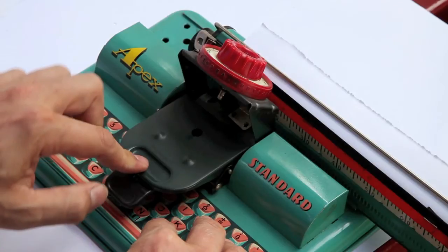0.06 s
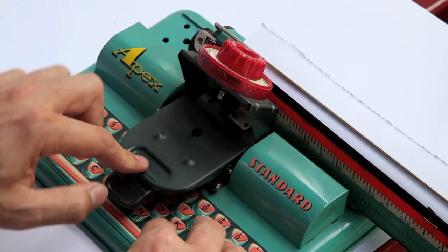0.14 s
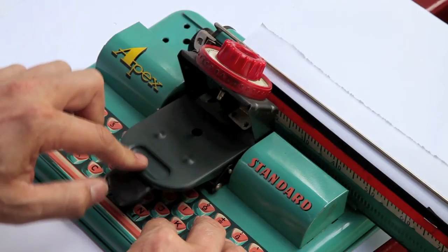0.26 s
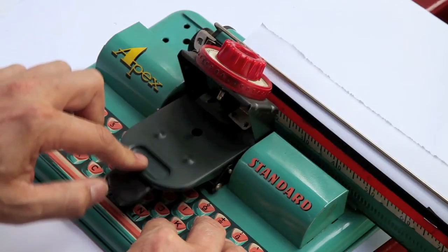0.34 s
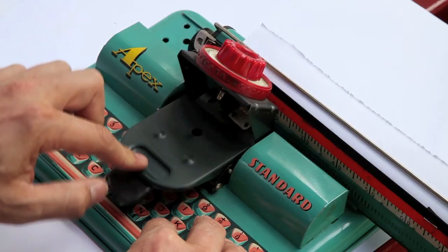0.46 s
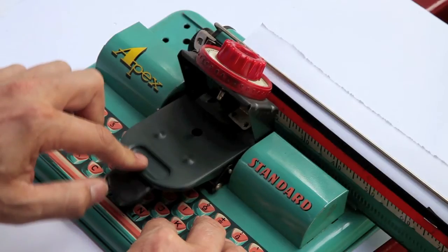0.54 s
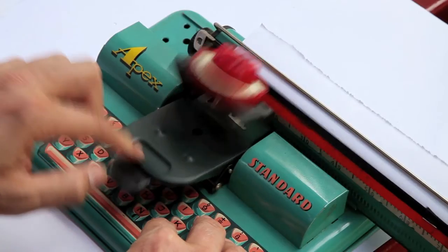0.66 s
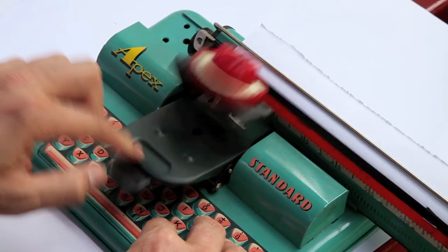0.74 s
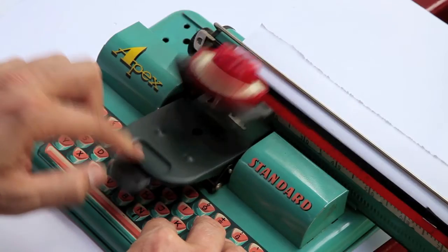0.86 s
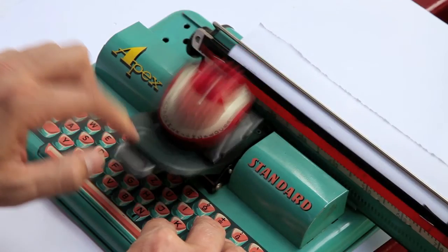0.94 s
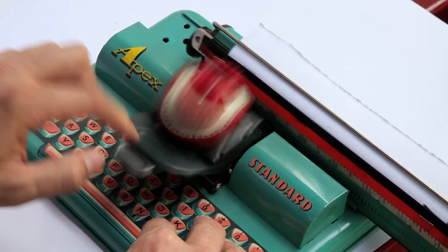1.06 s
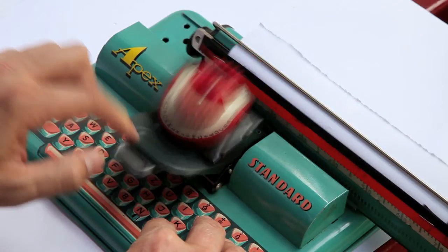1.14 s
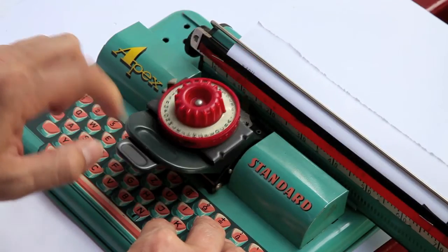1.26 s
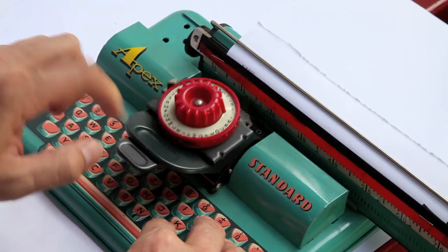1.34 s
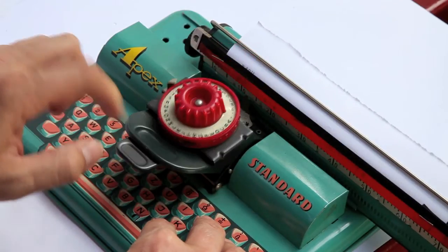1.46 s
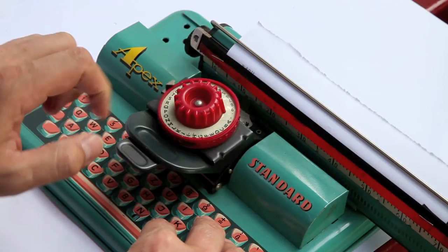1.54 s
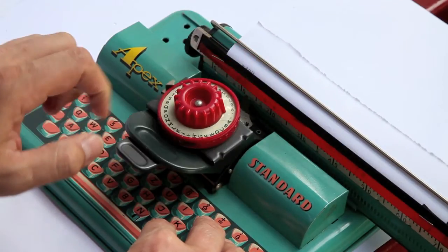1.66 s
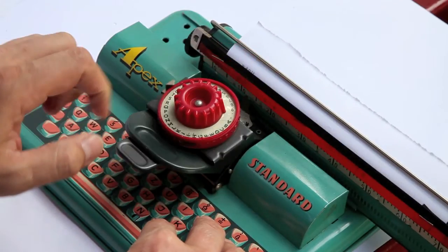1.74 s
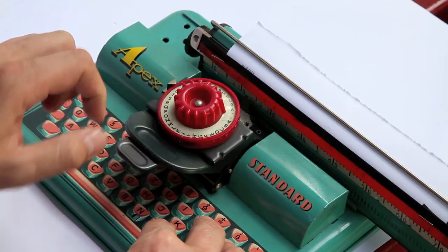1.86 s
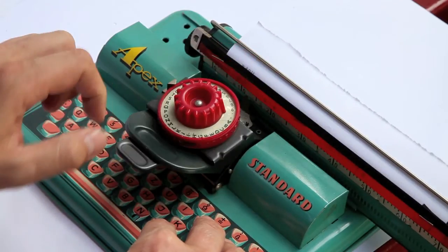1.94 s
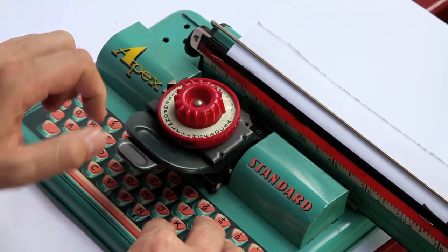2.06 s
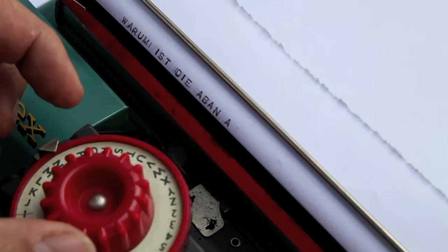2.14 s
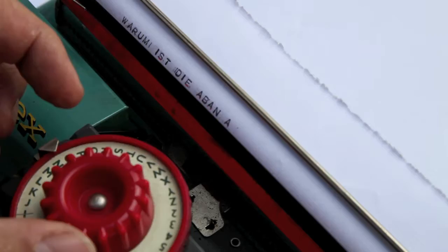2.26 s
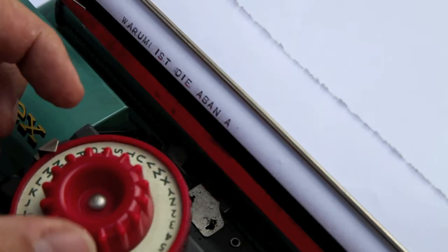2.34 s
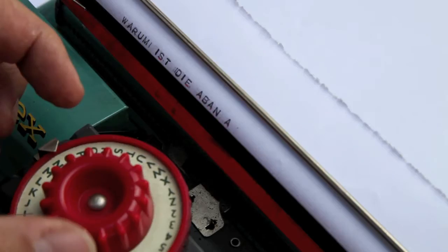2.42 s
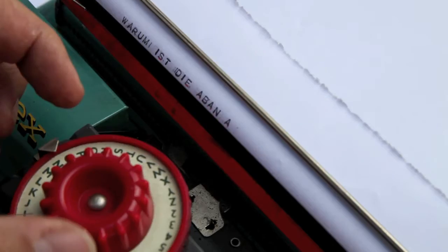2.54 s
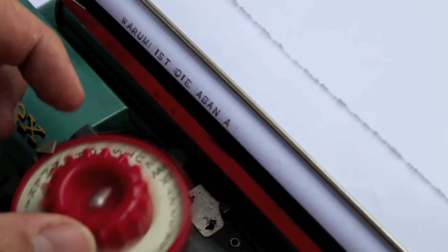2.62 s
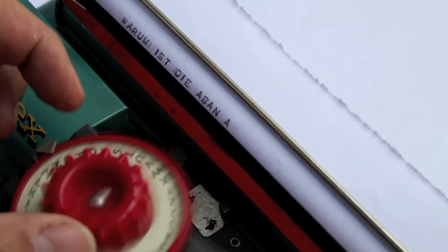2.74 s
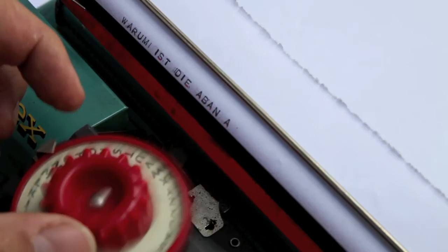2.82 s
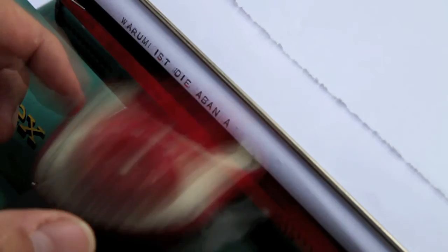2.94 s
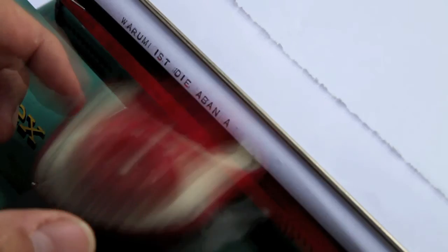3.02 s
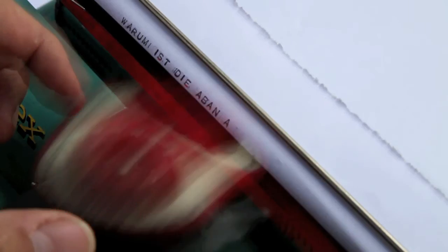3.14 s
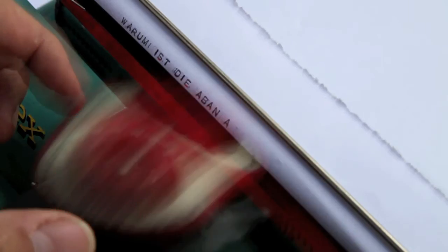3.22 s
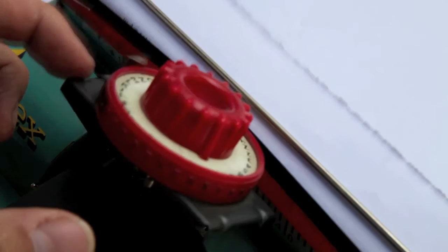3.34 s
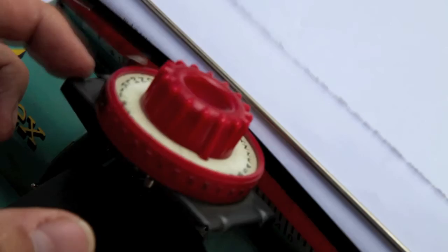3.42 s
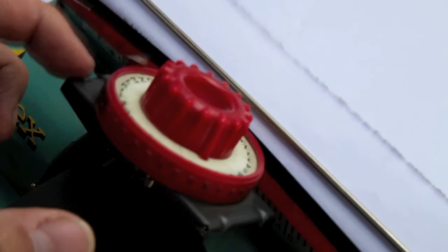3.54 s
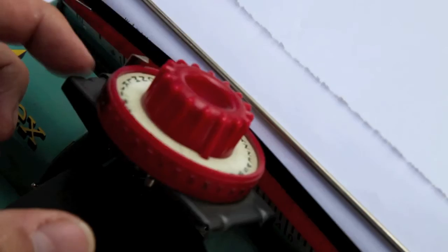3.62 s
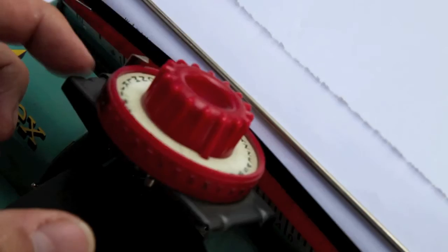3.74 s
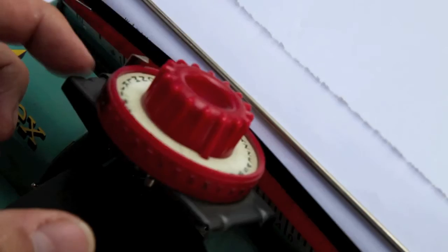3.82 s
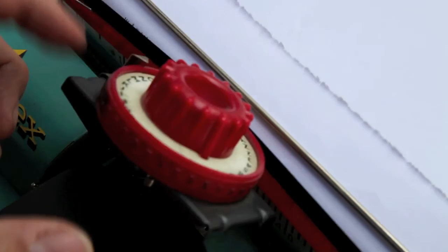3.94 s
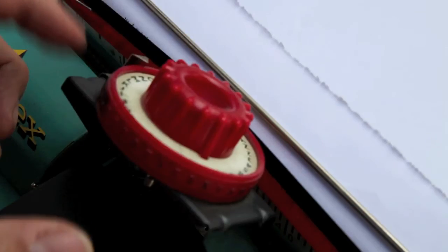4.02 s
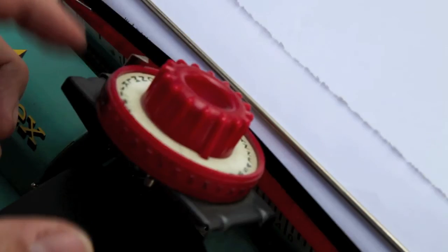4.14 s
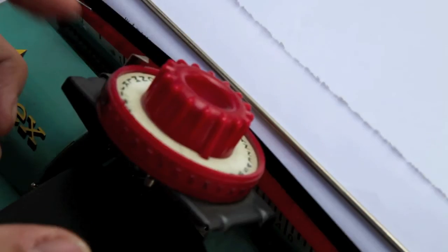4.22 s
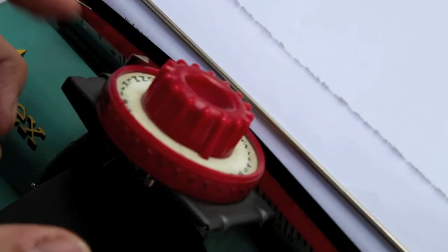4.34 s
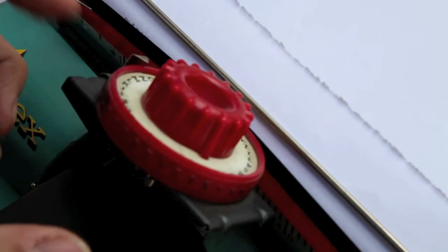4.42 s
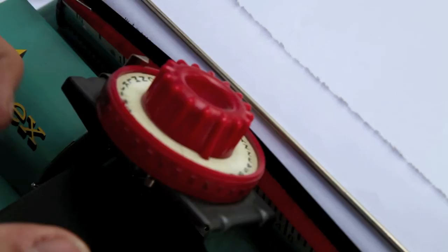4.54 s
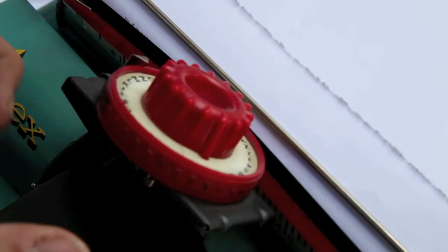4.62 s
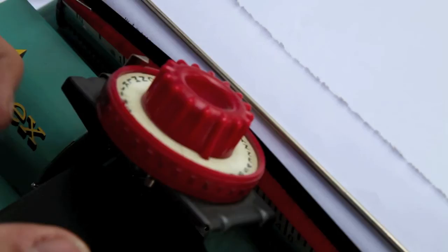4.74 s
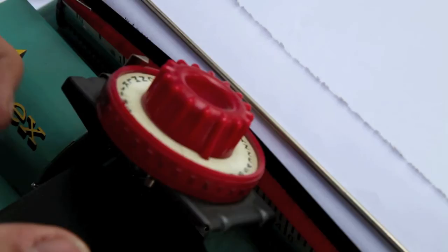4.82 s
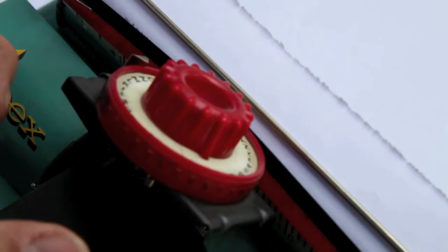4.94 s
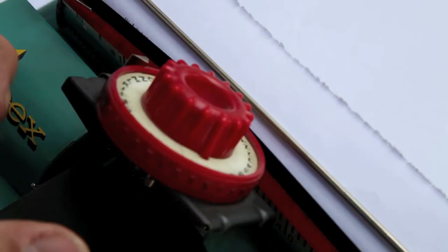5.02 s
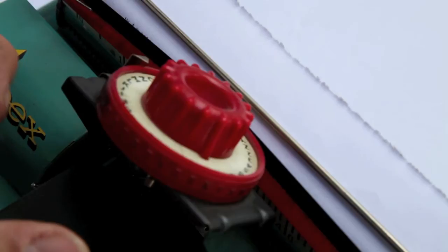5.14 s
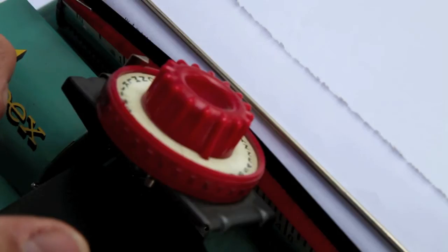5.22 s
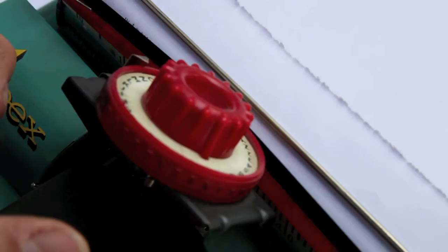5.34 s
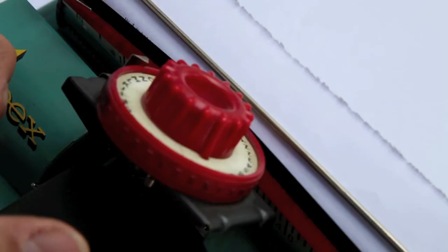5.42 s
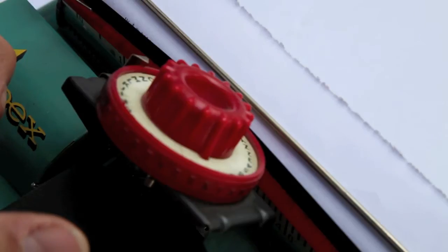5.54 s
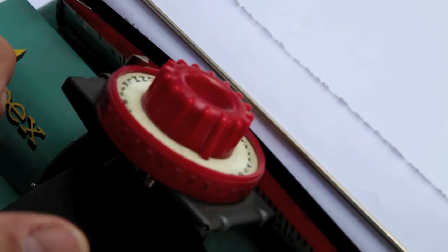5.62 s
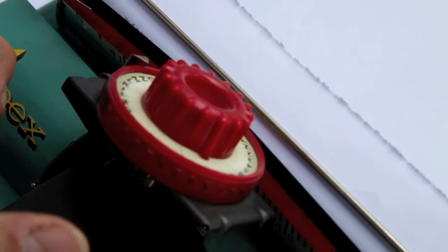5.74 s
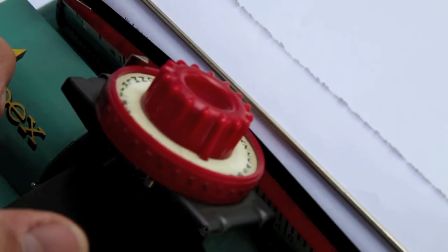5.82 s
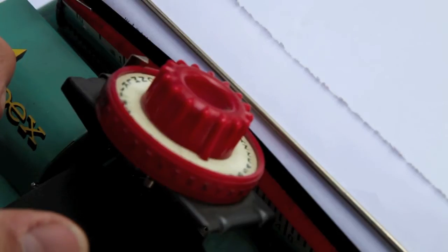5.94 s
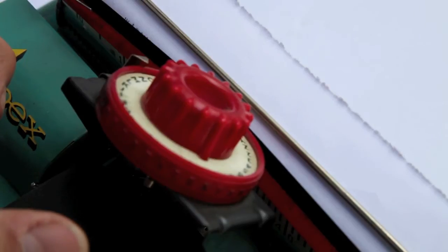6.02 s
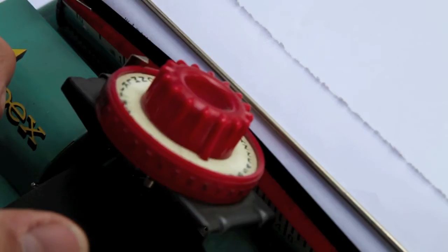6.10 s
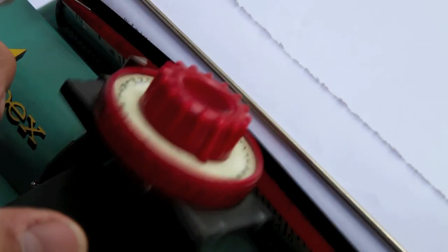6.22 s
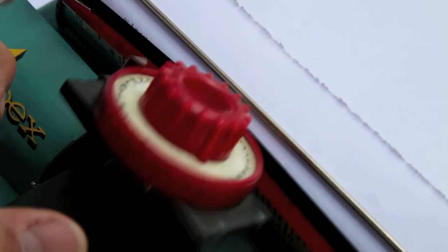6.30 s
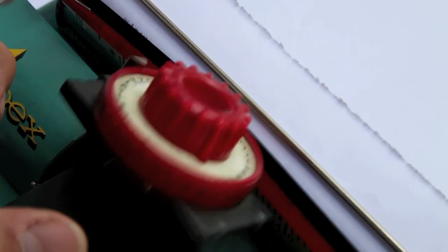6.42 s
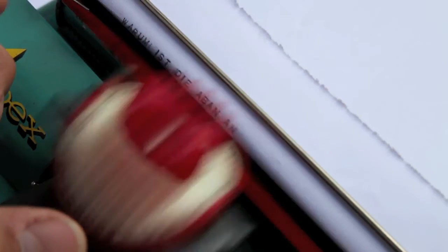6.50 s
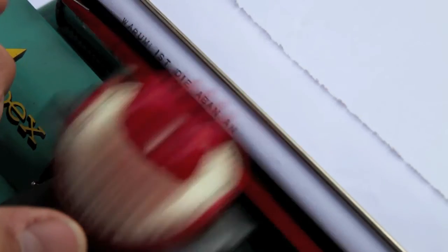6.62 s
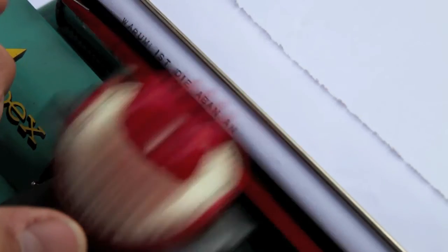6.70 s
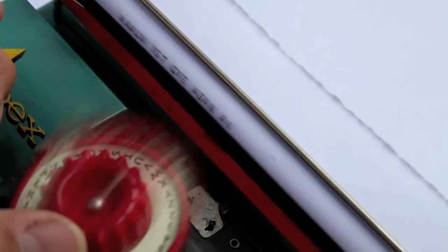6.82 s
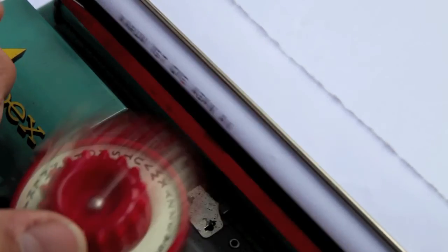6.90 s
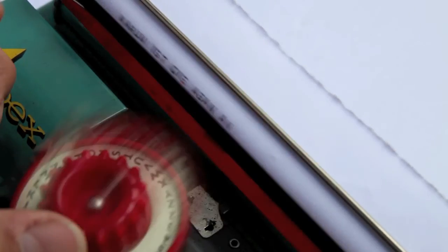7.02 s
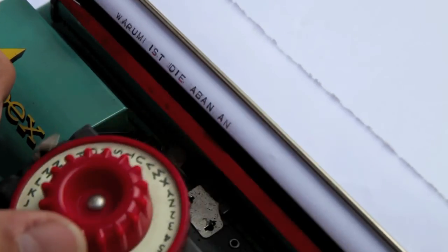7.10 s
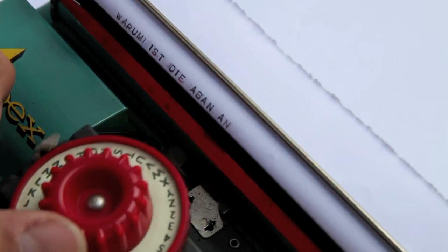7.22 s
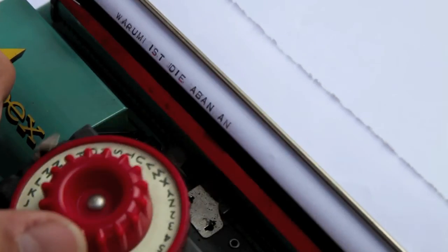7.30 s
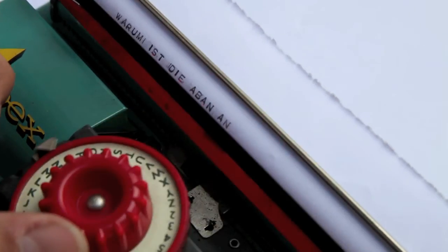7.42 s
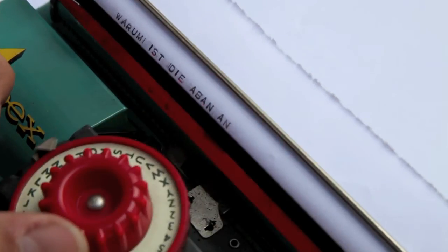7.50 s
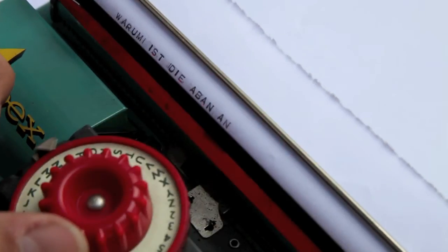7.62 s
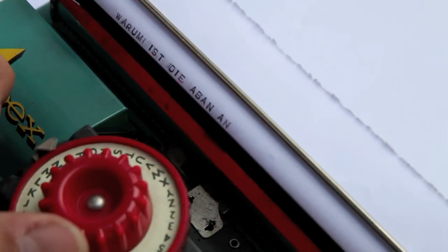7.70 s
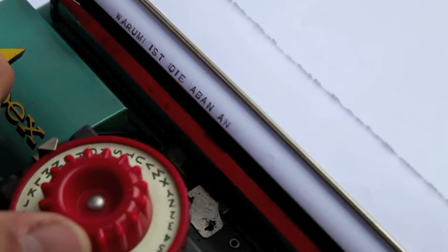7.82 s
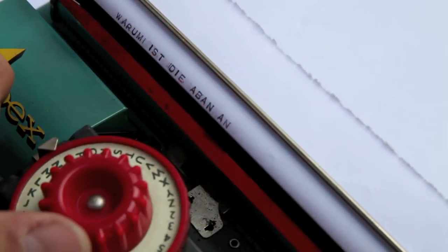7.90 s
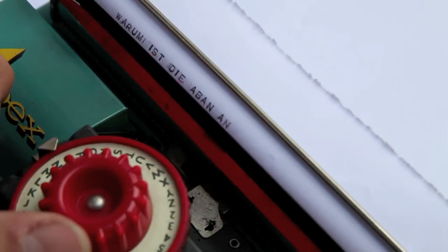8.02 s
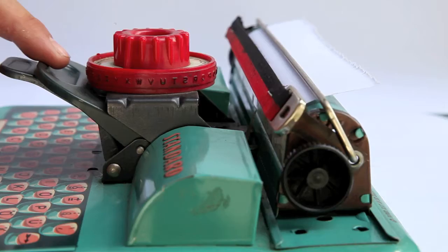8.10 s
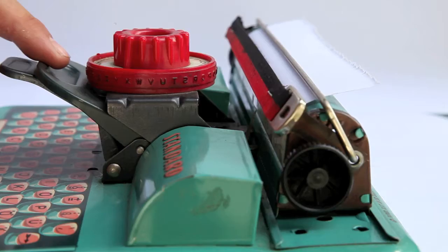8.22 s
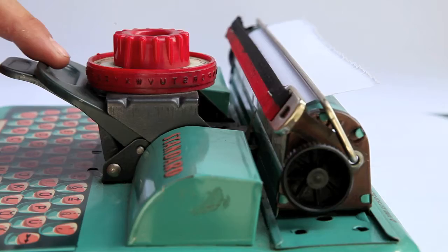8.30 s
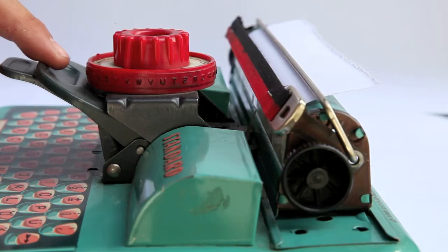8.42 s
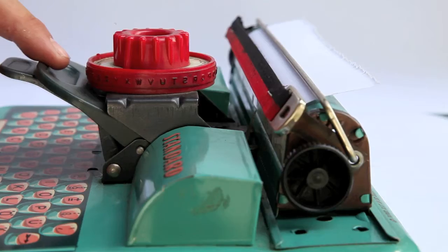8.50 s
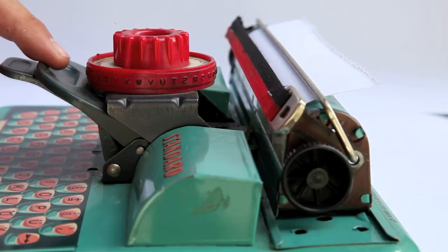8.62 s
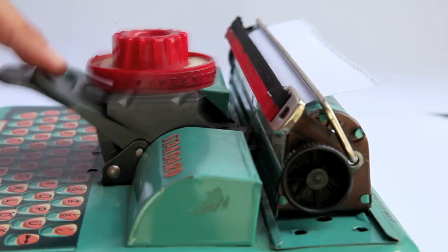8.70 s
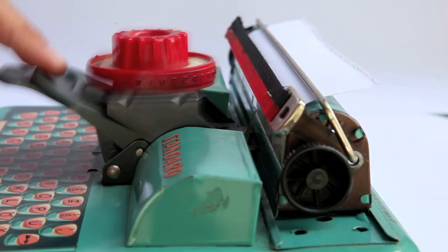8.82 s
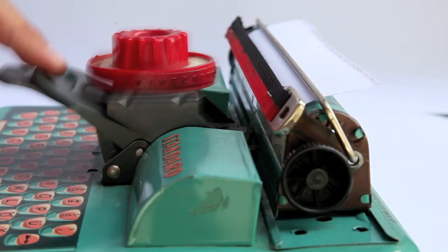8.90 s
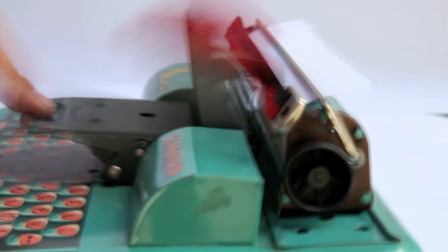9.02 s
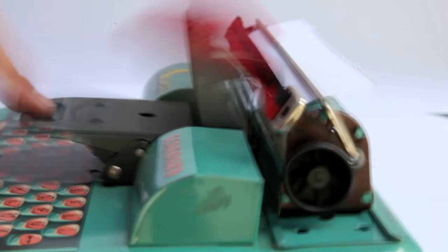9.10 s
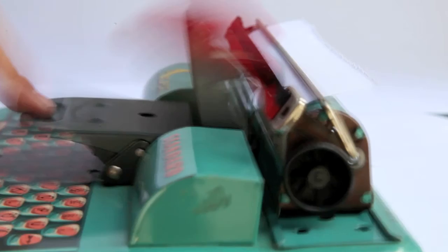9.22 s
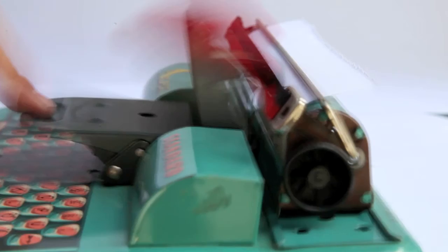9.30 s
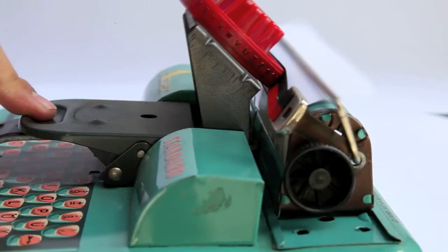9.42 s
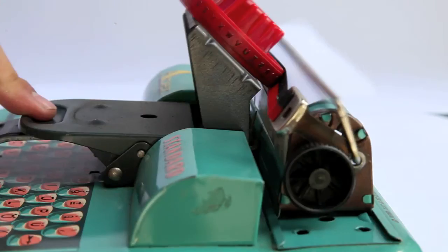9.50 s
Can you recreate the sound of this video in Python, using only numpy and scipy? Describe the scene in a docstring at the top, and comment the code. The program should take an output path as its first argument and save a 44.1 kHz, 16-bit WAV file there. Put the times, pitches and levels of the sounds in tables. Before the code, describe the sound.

Everything sounds muffled and low, as if slowed down. Light metal clicks and pawl knocks lead to four loud, separated tin clacks, two of them followed by loose rattling and bounces. The tin body rings on after each. Low rumble and soft rustle of handling swell and fade between, with a brief groan before the final clack. Close microphone, quiet room.

```python
"""A tin index typewriter is worked slowly in a quiet room; everything sounds deep and dull, as if slowed down.
Twice its type wheel is driven against the paper, bounces and shakes loose parts; twice it falls back to rest.
Light lever and pawl clicks lead up to each clack. Each contact is a damped burst of tin modes and noise,
which rings on through modal and diffuse responses; coloured noise gives rattle, handling and room.
A groaning pivot and a thin spring are tones; the hardest clacks overload the recorder."""
import sys
import numpy as np
from scipy import signal
from scipy.fft import rfft, irfft
from scipy.io import wavfile

SR = 44100
rng = np.random.default_rng(int(sys.argv[2]) if len(sys.argv) > 2 else 0)


def digitize_waveform(pressure):
    """Quantize a signal to 16-bit integers and store it at the path in sys.argv[1].

    Rows of a 2-D input are taken as channels; values are limited to [-1, 1].
    """
    field = np.atleast_2d(pressure).T
    bounded = np.clip(field, -1, 1)
    quanta = np.round(bounded * 32767).astype(np.int16)
    wavfile.write(sys.argv[1], SR, quanta)


N = 421155

# modes of the sheet metal: f/Hz, struck level/dB, lingering level/dB, lingering t60/s
TIN_MODES = [(115, -6, -8.5, 0.99), (287, -10, -12, 0.77), (315.2, -4, -14.5, 0.67), (466, -6.5, -21, .7),
             (553.7, -2, -20.5, 0.67), (624, -6.5, -18.5, 0.42), (670.4, -3, -15.5, 0.43),
             (731, -1.5, -18.5, 1.3), (798.7, -2.5, -12.5, 0.62), (800, 1, -15.5, 0.6),
             (865.6, 0.5, -12.5, 2.1), (959, 0, -23.5, 0.71), (986.4, -1.5, -18, 1.3),
             (1074, 0.5, -15.5, 1.6), (1191, -1, -20.5, .8), (1311, -2, -20, 1.2), (1382, 1.5, -22, 0.88),
             (1417.6, 0.5, -23.5, .6), (1530, 0, -17, 1.3), (1680, 0.5, -17.5, 1.5), (1625, -6, -22, .7),
             (1772, -1.5, -19, 1.1), (1820, -3, -12, 0.98), (1883, -6.5, -13.5, 1.3), (2024, 1, -7.5, 1.5),
             (2116, -4.5, -12, 1.1), (2266, -3, -17.5, .7), (2175, -2, -10.5, 1), (2550, 6, -20.5, .8)]
# wheel hits paper, lever meets its stop and bounces: t/s, peak/dB, bass/dB, treble/dB,
# stop delay/s, stop peak/dB, bounce delay/s, bounce peak/dB, spring level/dB, rattle level/dB
PRINTS = [(2.939, 4.5, -2, -4.5, 0.087, -8, .161, -15, 2, -20.5),
          (8.7215, 0.38, -8, -3.5, .074, -1.5, .209, -10, 20, -19)]
# wheel falls back to rest: t/s, peak/dB, bass/dB, latch peak/dB, rebound peak/dB, rattle level/dB
FALLS = [(0.798, -.5, -2, -20, -21.5, -33.5), (6.789, 1, 2.5, -9, -18.5, -40.5)]


def from_db(db):
    """Decibels to gain."""
    return 10 ** (np.asarray(db) / 20)


def rms_one(x):
    """Scale to unit rms."""
    return x / np.sqrt(np.mean(x ** 2) + 1e-20)


def dying(t, t60):
    """Exponential decay that has lost 60 dB at t60."""
    return np.exp(-np.log(1000) * t / t60)


def through(x, response):
    """Pass a sound through an impulse response."""
    return signal.oaconvolve(x, response)[:len(x)]


def response_of(spectrum, size=4096):
    """Causal (minimum-phase) impulse response with the given colour, via the folded cepstrum."""
    hz, db = np.transpose(spectrum)
    grid_hz = np.maximum(np.fft.rfftfreq(size, 1 / SR), 1)
    magnitude = from_db(np.interp(np.log(grid_hz), np.log(hz), db))
    cepstrum = irfft(np.log(magnitude))
    cepstrum[1:size // 2] *= 2
    cepstrum[size // 2 + 1:] = 0
    return irfft(np.exp(rfft(cepstrum)))[:size // 2]


def noise(spectrum):
    """Coloured noise, rms 1."""
    return rms_one(through(rng.standard_normal(N), response_of(spectrum)))


def modal_response(modes):
    """Decaying sines; each mode's dB is its gain at resonance."""
    t = np.arange(2 * SR) / SR
    response = np.zeros(len(t))
    for hz, db, t60 in modes:
        per_sample = 2 * np.log(1000) / (t60 * SR)   # makes the resonant gain independent of t60
        response += from_db(db) * per_sample * dying(t, t60) * np.sin(2 * np.pi * hz * t)
    return response


def shelved(x, bass_db, treble_db, bass_hz=420, treble_hz=1350):
    """Boost or cut bass and treble: two second-order shelves."""
    for db, hz, is_bass in ((bass_db, bass_hz, True), (treble_db, treble_hz, False)):
        g, w = from_db(db / 4), 2 * np.pi * hz
        upper = [1, np.sqrt(2) * w * g, (w * g) ** 2]
        lower = [1, np.sqrt(2) * w / g, (w / g) ** 2]
        b, a = (upper, lower) if is_bass else (from_db(db) * np.array(lower), upper)
        x = signal.lfilter(*signal.bilinear(b, a, SR), x)
    return x


def clacks(frame, contacts, chatter_db, spread_db, detune):
    """Each contact sets off its own mix of tin modes plus metal chatter, quickly damped, via the frame."""
    t = np.arange(SR // 2) / SR
    hz, struck_db = np.transpose(TIN_MODES)[:2]
    out = np.zeros(N + len(t))
    for s, peak_db, bass_db, treble_db, rise_s, t60_s in contacts:
        strengths = from_db(struck_db + spread_db * rng.standard_normal(len(hz)))
        pitches_hz = hz * (1 + detune * rng.standard_normal(len(hz)))
        start_cycles = rng.random((len(hz), 1))
        swings = np.sin(2 * np.pi * (pitches_hz[:, None] * t + start_cycles))
        metal = strengths @ swings + from_db(chatter_db) * rng.standard_normal(len(t))
        burst = metal * np.minimum(t / rise_s, 1) * dying(np.maximum(t - rise_s, 0), t60_s)
        blow = shelved(through(burst, frame), bass_db, treble_db)
        at = round(s * SR)
        out[at:at + len(t)] += from_db(peak_db) * blow / np.abs(blow).max()
    return out[:N]


def background():
    """Low rumble and soft rustle; both swell as the hands move on the machine, then die away."""
    # colour of the rumble: f/Hz, level/dB
    rumble_colour = [(22, 3.5), (42, -1.5), (75, 0), (170, 0.5), (300, -9), (500, -17), (1000, -43.5),
                     (2000, -76)]
    # colour of the rustle: f/Hz, level/dB
    rustle_colour = [(100, -13), (350, -1), (550, 1), (950, -4.5), (1250, -17), (1500, -28), (2000, -35),
                     (2500, -45.5), (2900, -55)]
    # hand movements: start t/s, decay-start t/s, full rise time/s, rumble level/dB, rustle level/dB
    hand_moves = [(0, 0.87, 0.016, -44, -52), (1.2, 2.11, 0.47, -48, -72.5), (2.2, 2.954, 0.14, -37, -47),
                  (3, 6.75, 4.84, -42.5, -51.5), (8.108, 8.762, 0.19, -36.5, -41)]
    rumble_t60_s, rustle_t60_s = 2.3, 6.4
    rumble_gain, rustle_gain = from_db(-56), from_db(-67)   # room alone
    t = np.arange(N) / SR
    for start, end, swell, rumble_db, rustle_db in hand_moves:
        moving = np.clip((t - start) / swell, 0, 1)
        since = np.maximum(t - end, 0)
        # powers add
        rumble_gain = np.hypot(rumble_gain, from_db(rumble_db) * moving * dying(since, rumble_t60_s))
        rustle_gain = np.hypot(rustle_gain, from_db(rustle_db) * moving * dying(since, rustle_t60_s))
    return rumble_gain * noise(rumble_colour) + rustle_gain * noise(rustle_colour)


def lever_clicks():
    """The lever clicks in its play: one light contact each."""
    # clicks: t/s, peak/dB, treble/dB, rise/s
    clicks = [(.092, -17.5, 4.5, .002), (.205, -26, -9.5, 0.0026), (.365, -32, 0, 0.0019),
              (.760, -31.5, 9, .0025), (2.621, -33.5, -7.5, .01), (2.844, -34, 4.5, 0.0077),
              (2.889, -10, -11, 0.027), (5.944, -44.5, 13, 0.0027), (6.211, -32, 0.5, 0.0039),
              (6.724, -23, -1, 0.006), (8.402, -23, -2.5, 0.0033), (8.487, -34.5, 5, .004),
              (8.612, -37, 0, 0.0032)]
    bass_db, t60_s = -3, 0.2
    return [(s, db, bass_db, treble_db, rise_s, t60_s) for s, db, treble_db, rise_s in clicks]


def ringing(blows):
    """The tin rings on in a few clear modes over a dense, diffuse tail."""
    tail_db, tail_t60_s = -19.5, 1.44
    t = np.arange(2 * SR) / SR
    clear = modal_response([(hz, db, t60) for hz, _, db, t60 in TIN_MODES])
    diffuse = rng.standard_normal(len(t)) * dying(t, tail_t60_s)
    tail = from_db(tail_db) * diffuse / np.linalg.norm(diffuse)
    return through(blows, tail + clear)


def pawl_clicks():
    """The pawl catches sharply, then seats with a slower, duller knock."""
    # pawl moves: catch t/s, catch peak/dB, seat delay/s, seat peak/dB, bass/dB
    pawls = [(.438, -27.5, 0.052, -37, 2.5), (2.383, -17.5, .049, -3.5, -2.5),
             (5.983, -12.5, 0.051, -21, 0), (6.368, -32, .047, -30, 2.5), (8.217, -20, 0.062, -17, -6.5)]
    contacts = []
    for s, catch_db, after_s, seat_db, bass_db in pawls:
        # t/s, peak/dB, bass/dB, treble/dB, rise/s, t60/s
        contacts += [(s, catch_db, bass_db, -2.5, 0.0019, 0.2),
                     (s + after_s, seat_db, bass_db, -5, 0.008, 0.16)]
    return contacts


def falling_blows():
    """A bright hit on the rest, the carrier's shudder, the latch and one late rebound."""
    contacts = []
    for s, db, bass_db, latch_db, rebound_db, _ in FALLS:
        # t/s, peak/dB, bass/dB, treble/dB, rise/s, t60/s
        contacts += [(s, db, bass_db, 8, 0.00033, 0.13),
                     (s + 0.013, db - 4, bass_db, 5.5, 0.0036, 0.29),
                     (s + 0.079, latch_db, -4.5, 0.5, 0.003, 0.24),
                     (s + 0.258, rebound_db, 2, 2.5, 0.007, 0.2)]
    return contacts


def thumps(rise_s=0.0014):
    """The base gives a low, damped swing at some blows and knocks, cut off after 0.5 s."""
    # swings of the base: t/s, f/Hz, level/dB, t60/s
    base_swings = [(0.7982, 294, 0.5, 0.037), (2.447, 105, -14.5, 0.16), (3.02, 140, -16, 0.16),
                   (5.989, 118.7, -31, 0.22), (6.796, 170.4, -28, 0.23), (8.802, 128.2, -23, 1)]
    t = np.arange(SR // 2) / SR
    out = np.zeros(N + len(t))
    for s, hz, level_db, t60_s in base_swings:
        swing = np.sin(2 * np.pi * hz * t) * (1 - np.exp(-t / rise_s)) * dying(t, t60_s)
        at = round(s * SR)
        out[at:at + len(t)] += from_db(level_db) * swing
    return out[:N]


def shaking():
    """Rattle and thud gains: quick rise after each print or fall, slow fade, faster stop; thud dies sooner."""
    rise_s, lasts_s = 0.087, 0.6
    fade_db_per_s, stop_db_per_s = 37.5, 35   # the stop adds to the fade
    thud_db, thud_fade_db_per_s = -3, 17   # relative to the rattle
    rattle_gain = thud_gain = 0
    for s, *_, rattle_db in PRINTS + FALLS:
        age = np.maximum(np.arange(N) / SR - s, 0)
        fading = np.maximum(age - rise_s, 0)
        stopping = np.maximum(age - lasts_s, 0)
        level_db = rattle_db - fade_db_per_s * fading - stop_db_per_s * stopping
        gain = np.minimum(age / rise_s, 1) * from_db(level_db)
        rattle_gain = rattle_gain + gain
        thud_gain = thud_gain + gain * from_db(thud_db - thud_fade_db_per_s * fading)
    return rattle_gain, thud_gain


def rattle(frame, touches_per_s=400, touch_t60_s=0.11, spread_db=2, modal_db=3, modal_t60_s=0.27):
    """Loose parts keep touching at random and excite the tin, while the base shudders on the table."""
    # colour of the base's thud: f/Hz, level/dB
    thud_colour = [(25, -12), (70, -9), (125, -7.5), (200, -8.5), (330, -6.5), (600, -28.5), (1500, -73.5)]
    touches = (rng.random(N) < touches_per_s / SR) * from_db(spread_db * rng.standard_normal(N))
    energy = through(touches ** 2, dying(np.arange(SR // 4) / SR, touch_t60_s) ** 2)
    chatter = np.sqrt(np.abs(energy)) * rng.standard_normal(N)
    tin = modal_response([(hz, struck_db + modal_db, modal_t60_s) for hz, struck_db, *_ in TIN_MODES])
    framed = through(chatter + through(chatter, tin), frame)
    shake = rms_one(shelved(framed, bass_db=-8, treble_db=-4))
    rattle_gain, thud_gain = shaking()
    return rattle_gain * shake + thud_gain * noise(thud_colour)


def level_dips():
    """Gain curve: the level dips briefly, as a bell shape in dB."""
    # dips: t/s, depth/dB, half width at 1/e of depth/s
    dips = [(2.189, -18, 0.024), (8.107, -19.5, 0.026)]
    t = np.arange(N) / SR
    return from_db(sum(depth_db * np.exp(-((t - s) / width_s) ** 2) for s, depth_db, width_s in dips))


def printing_blows():
    """A hard blow on the paper, a heavy knock as the lever bottoms out, and a weaker bounce."""
    contacts = []
    for s, db, bass_db, treble_db, stop_after_s, stop_db, bounce_after_s, bounce_db, _, _ in PRINTS:
        # t/s, peak/dB, bass/dB, treble/dB, rise/s, t60/s
        contacts += [(s, db, bass_db, treble_db, 0.0019, 0.1),
                     (s + stop_after_s, stop_db, 2, -5.5, 0.0015, 0.26),
                     (s + bounce_after_s, bounce_db, 4, -4, 0.008, 0.16)]
    return contacts


def spring(t60_s=1.8):
    """The stretched return spring sings thinly long after each printing blow: decaying sines."""
    # tones of the spring: f/Hz, level/dB
    spring_tones = [(1916, -68), (2024, -72.5), (2148, -80.5), (2336, -81)]
    out = np.zeros(N)
    for s, *_, spring_db, _ in PRINTS:
        age = np.maximum(np.arange(N) / SR - s, 0)
        for hz, db in spring_tones:
            out += from_db(spring_db + db) * dying(age, t60_s) * np.sin(2 * np.pi * hz * age)
    return out


def groan(waver_hz=22, split_hz=70, upper_db=-6):
    """Friction in the lever pivot sings in two close, unsteady tones that waver and sink overall."""
    # path of the lower tone: t/s, f/Hz, level of both tones/dB
    groan_path = [(8.26, 567, -46.5), (8.315, 557.4, -34.5), (8.381, 561.7, -41), (8.414, 549.7, -30.5),
                  (8.471, 553, -39.5), (8.526, 570, -31), (8.581, 533, -45), (8.69, 523, -49),
                  (8.717, 520, -29)]
    s, hz, db = np.transpose(groan_path)
    t = np.arange(N) / SR
    phase = 2 * np.pi * np.cumsum(np.interp(t, s, hz)) / SR
    unsteady = rng.standard_normal((2, N)) + 1j * rng.standard_normal((2, N))
    grip = signal.sosfilt(signal.butter(2, waver_hz, fs=SR, output="sos"), unsteady)
    lower = grip[0] * np.exp(1j * phase)
    upper = from_db(upper_db) * grip[1] * np.exp(1j * (phase + 2 * np.pi * split_hz * t))
    gain = from_db(np.interp(t, s, db)) * (t >= s[0]) * (t <= s[-1] + 0.002)
    return gain * rms_one((lower + upper).real)


def scene():
    """The machine over the room's noise, with brief dips in level."""
    # colour of a blow on the frame: f/Hz, level/dB
    frame_colour = [(30, -16), (110, -12.5), (300, -0.5), (430, -1), (620, -2), (800, 1), (1050, 0),
                    (1180, -6), (1320, -9.5), (1480, -14), (1800, -19), (2200, -27), (2500, -40.5),
                    (2900, -54)]
    light_ring_db = -2   # light contacts set the tin ringing less
    frame = response_of(frame_colour)
    light = clacks(frame, lever_clicks() + pawl_clicks(), chatter_db=18, spread_db=3, detune=0.029)
    heavy = clacks(frame, printing_blows() + falling_blows(), chatter_db=20, spread_db=2.5, detune=0.02)
    heavy = heavy + rattle(frame)
    lingering = ringing(heavy + from_db(light_ring_db) * light)
    machine = light + heavy + lingering + spring() + thumps() + groan()
    return ((machine + background()) * level_dips())[None]


def record(dry):
    """A narrow band goes in; only the clipped peaks and a trace of hiss reach above it."""
    bandwidth_hz, cutoff_hz = 2500, 16000
    overload, hiss_db = 1.0, -99
    dull = signal.sosfilt(signal.butter(16, bandwidth_hz, fs=SR, output="sos"), dry)
    clipped = np.clip(dull, -overload, overload)
    hissing = clipped + from_db(hiss_db) * rng.standard_normal(dry.shape)
    return signal.sosfilt(signal.cheby2(12, 70, cutoff_hz, fs=SR, output="sos"), hissing)


dry = scene()
out = record(dry)
digitize_waveform(out)
```